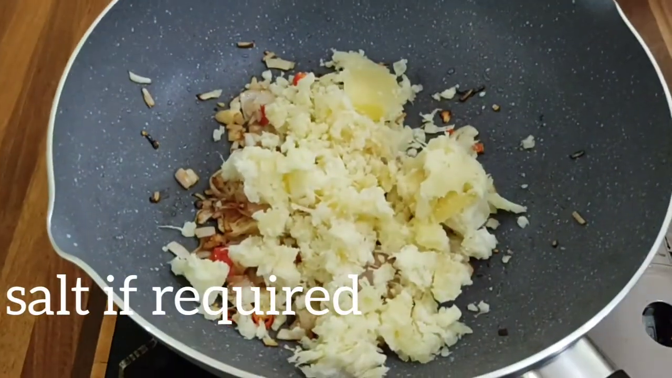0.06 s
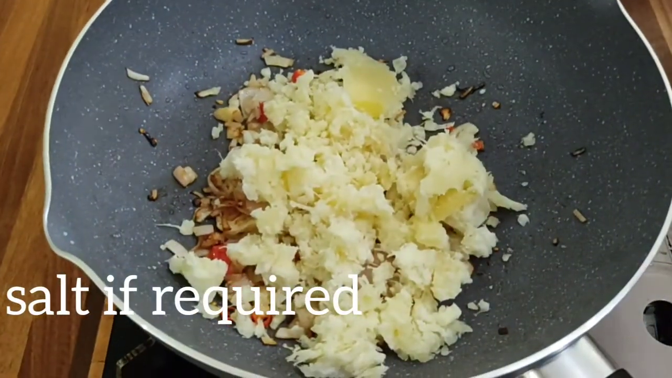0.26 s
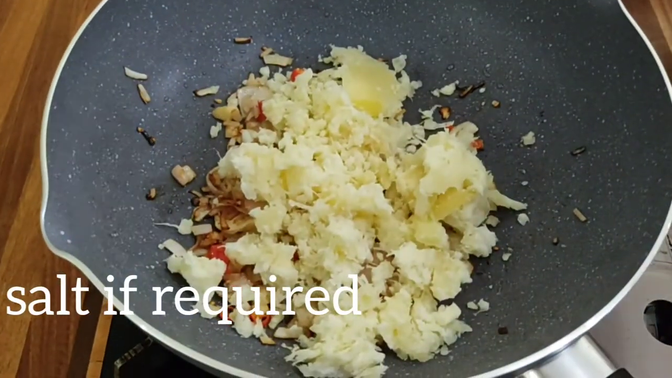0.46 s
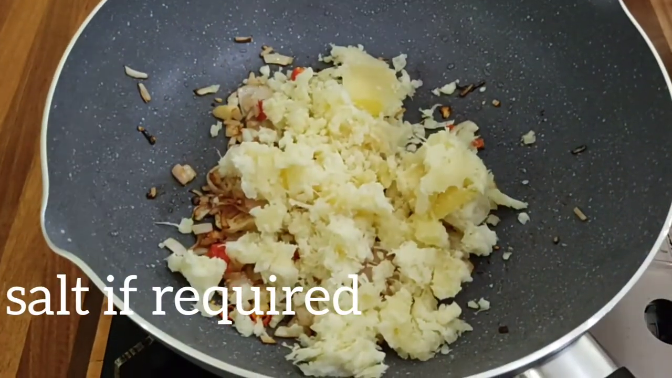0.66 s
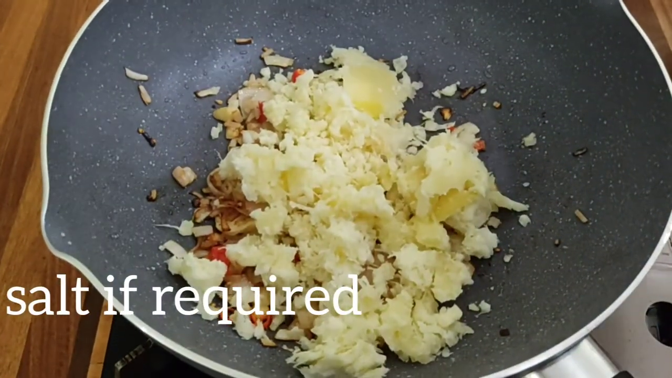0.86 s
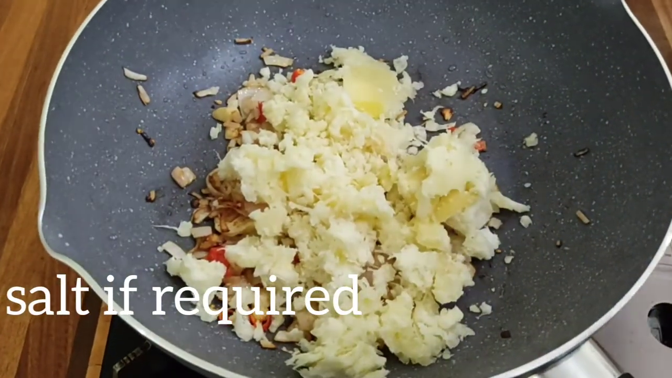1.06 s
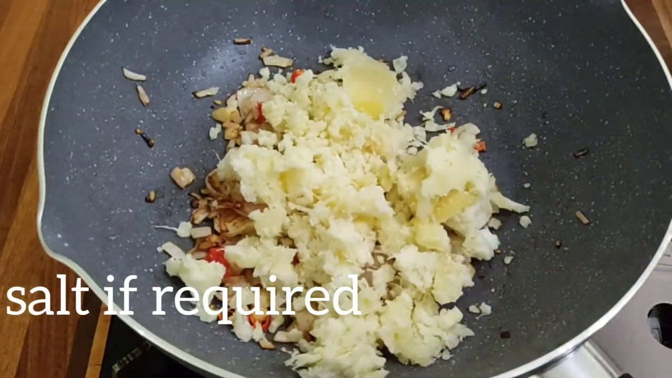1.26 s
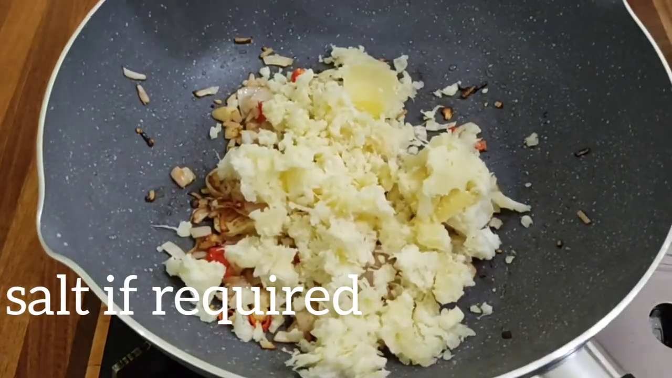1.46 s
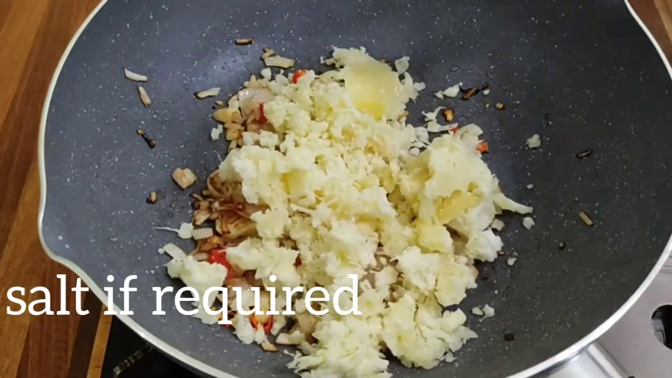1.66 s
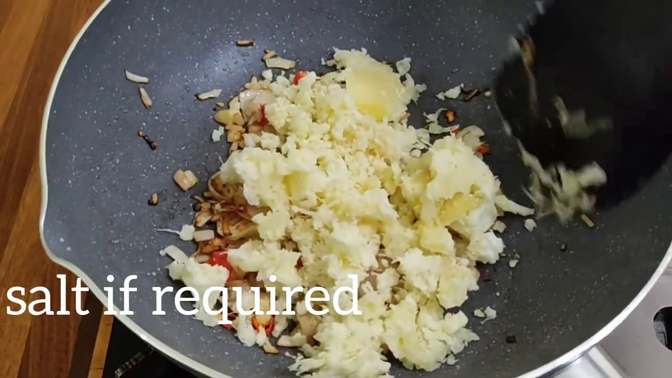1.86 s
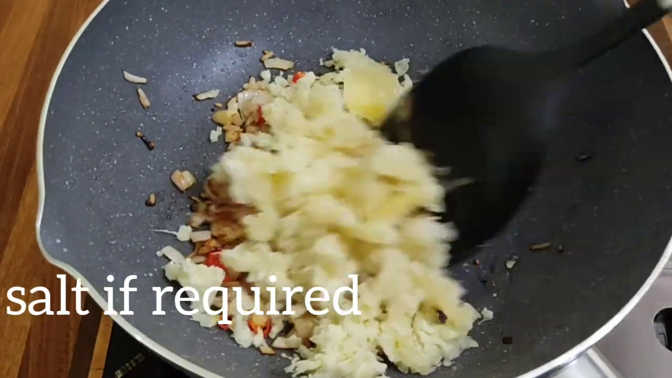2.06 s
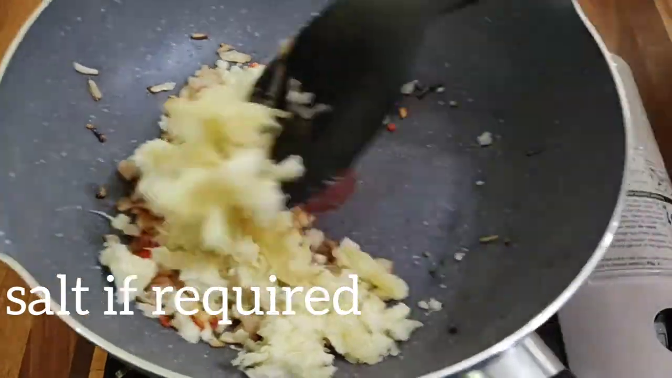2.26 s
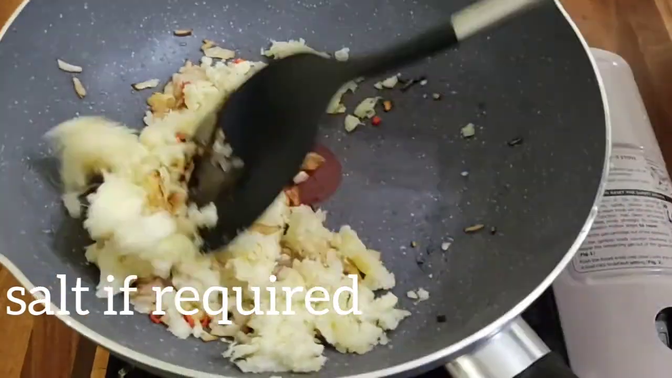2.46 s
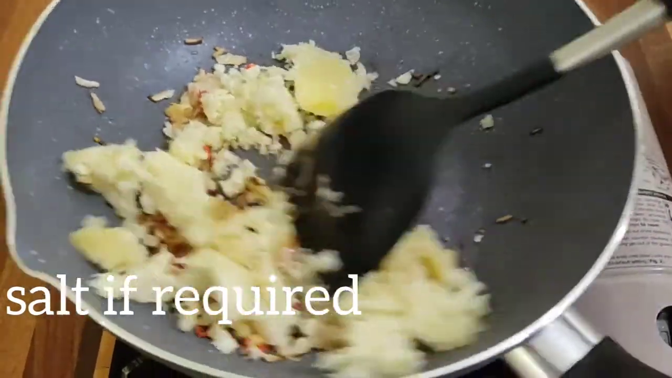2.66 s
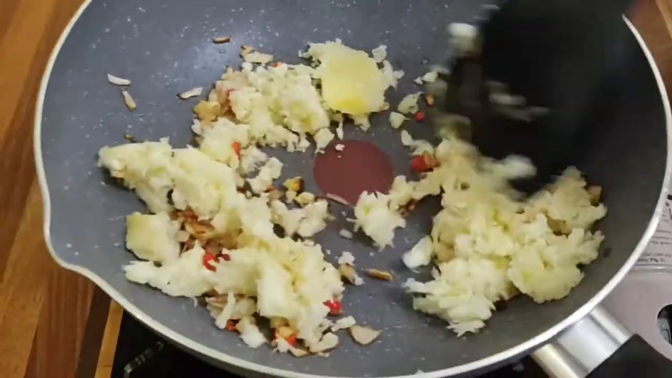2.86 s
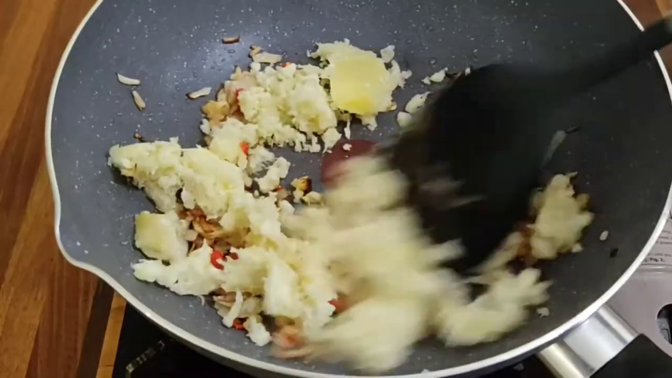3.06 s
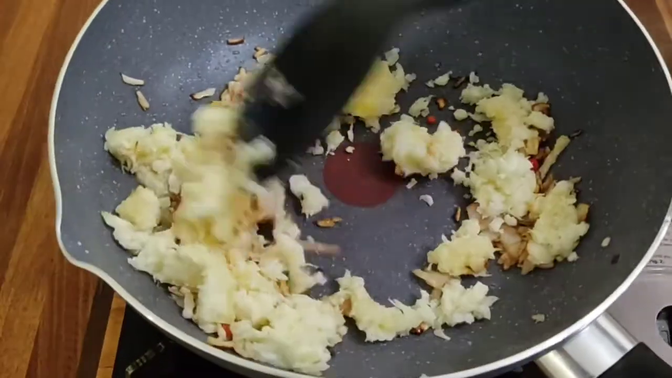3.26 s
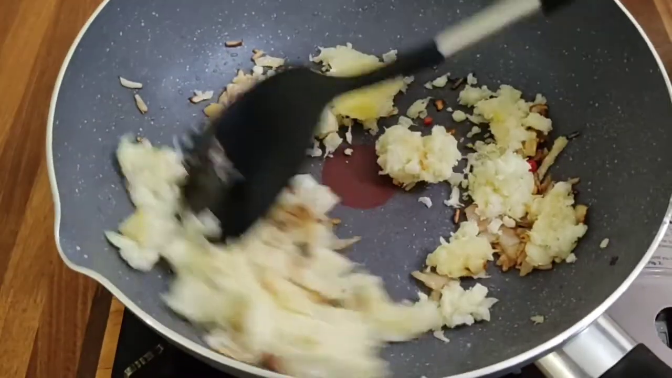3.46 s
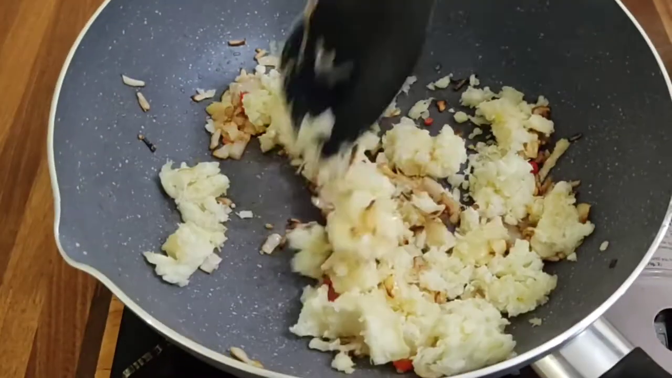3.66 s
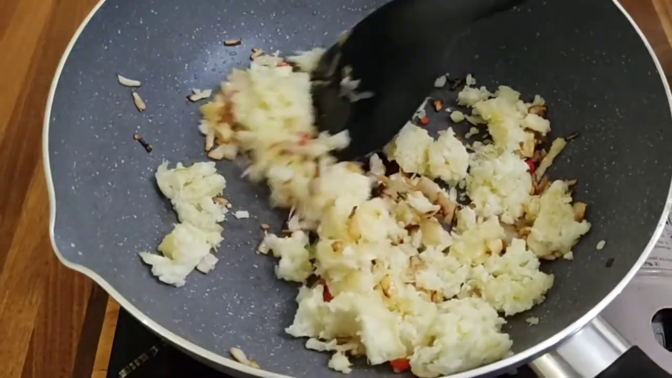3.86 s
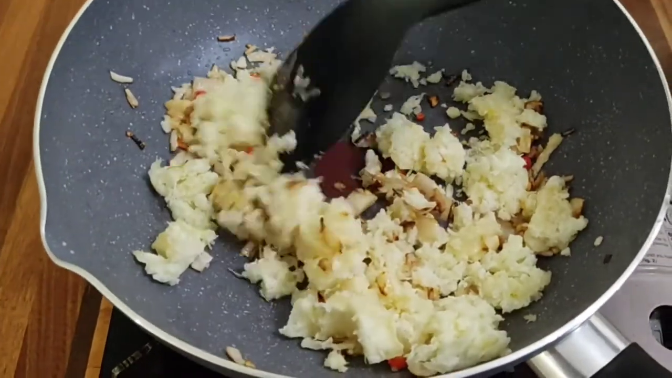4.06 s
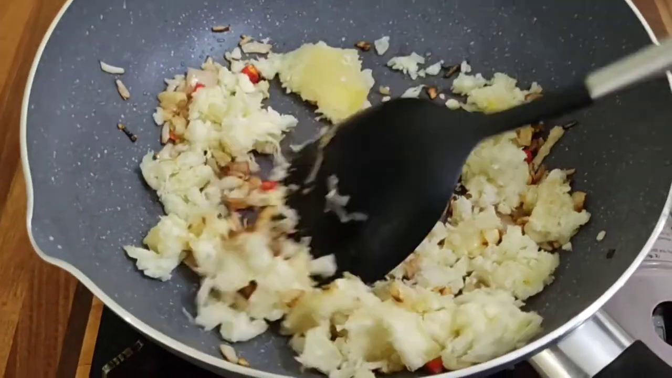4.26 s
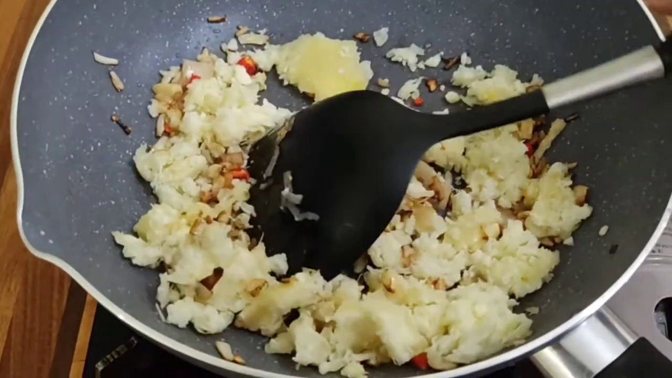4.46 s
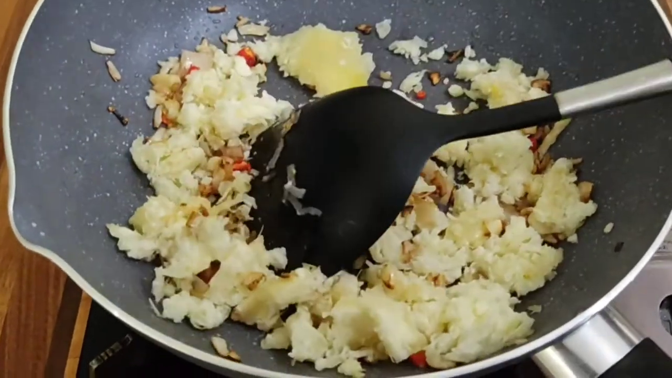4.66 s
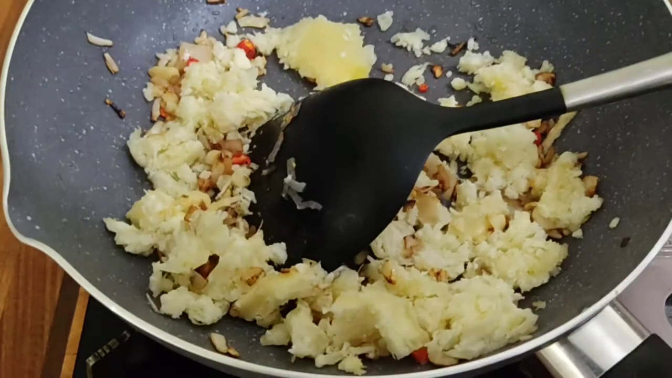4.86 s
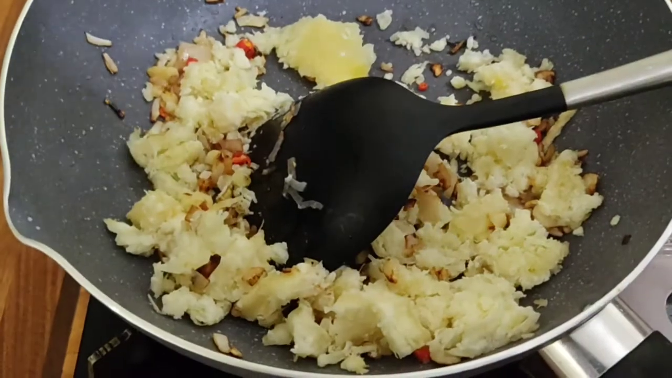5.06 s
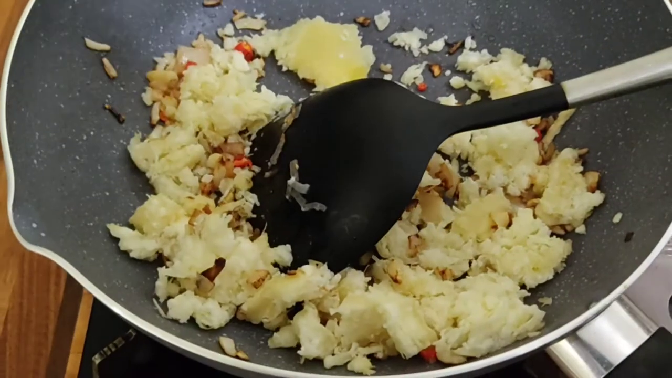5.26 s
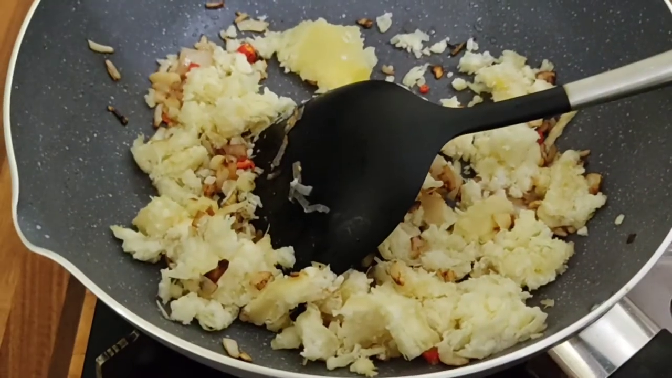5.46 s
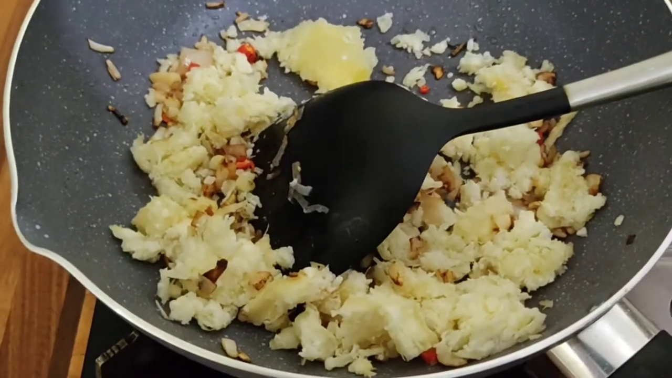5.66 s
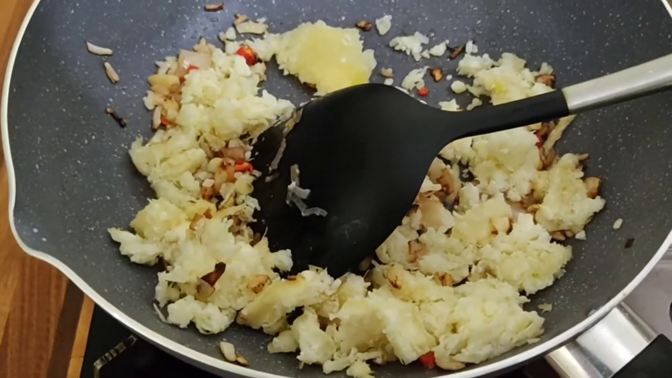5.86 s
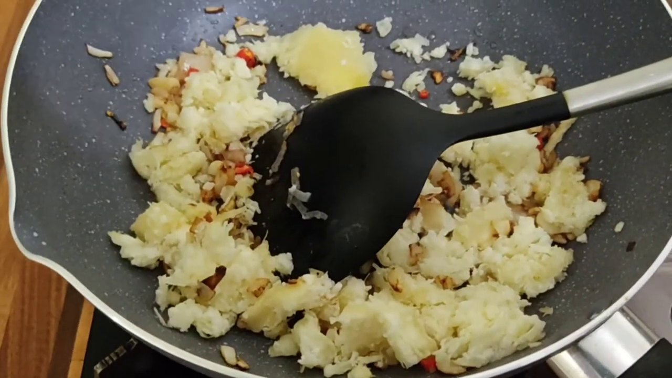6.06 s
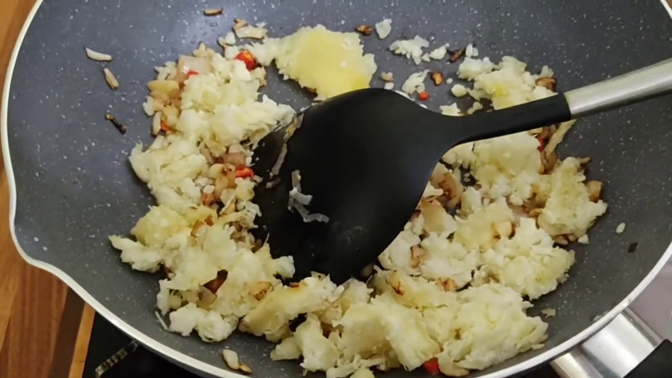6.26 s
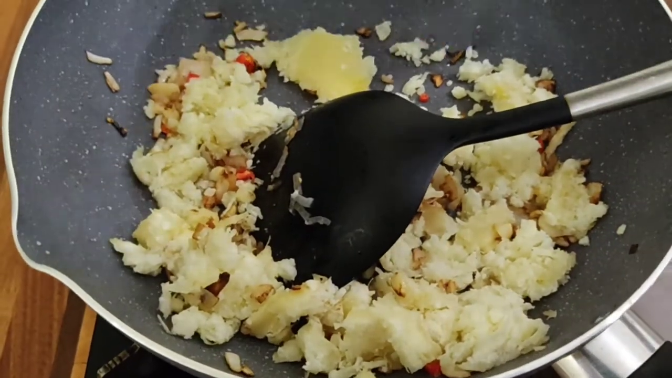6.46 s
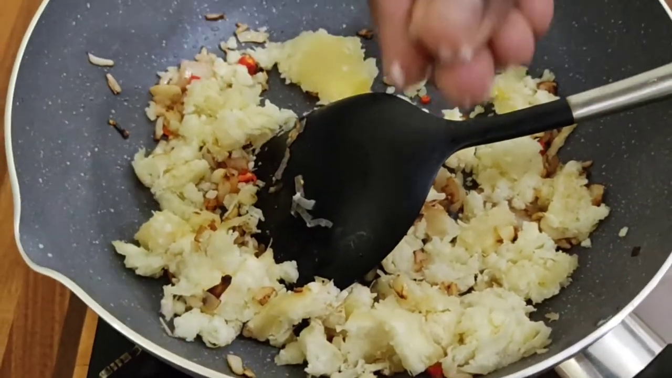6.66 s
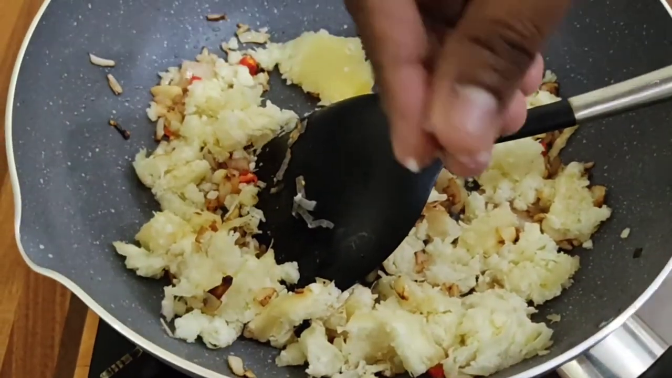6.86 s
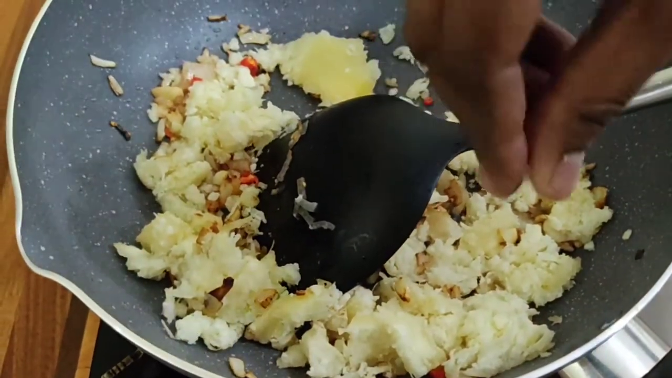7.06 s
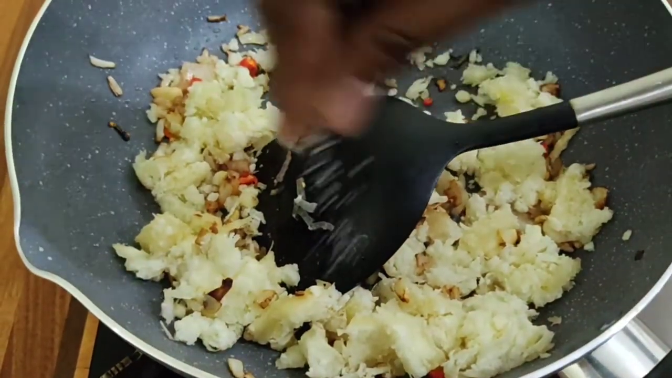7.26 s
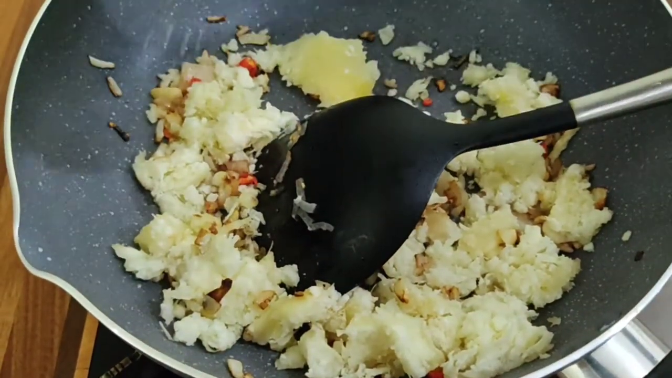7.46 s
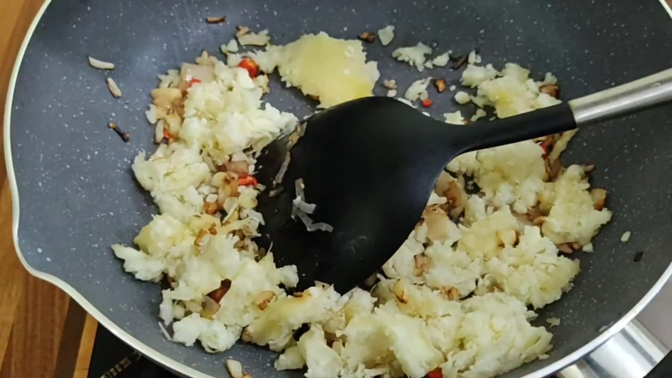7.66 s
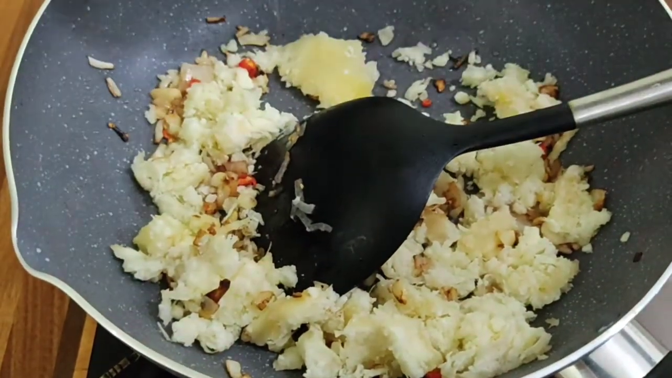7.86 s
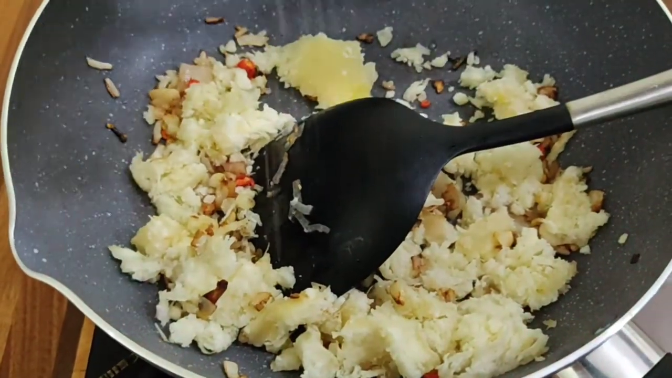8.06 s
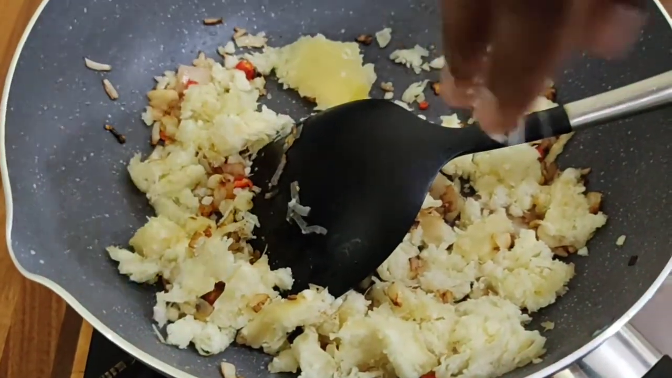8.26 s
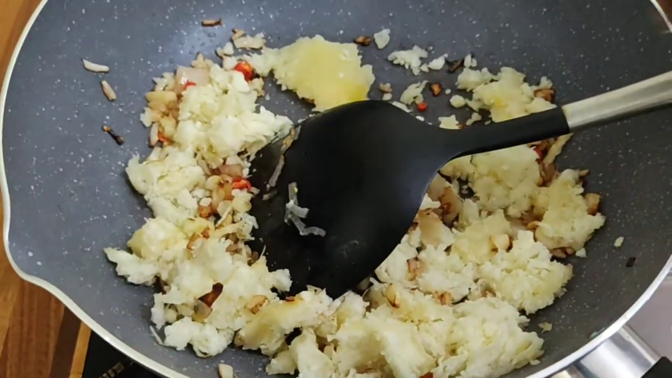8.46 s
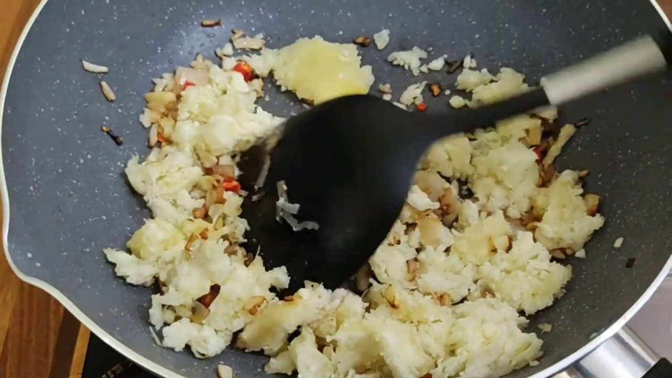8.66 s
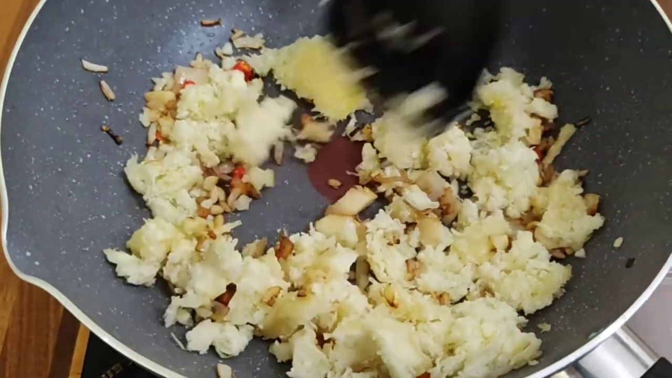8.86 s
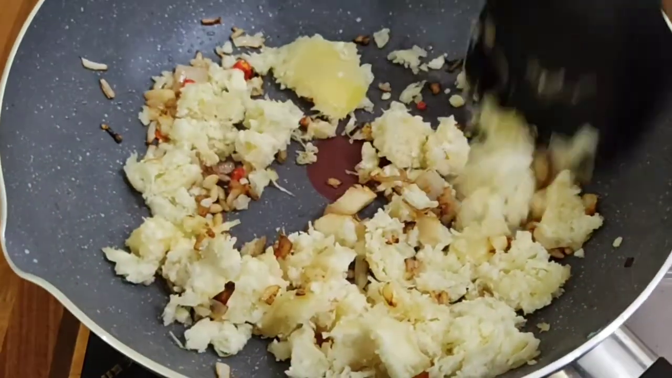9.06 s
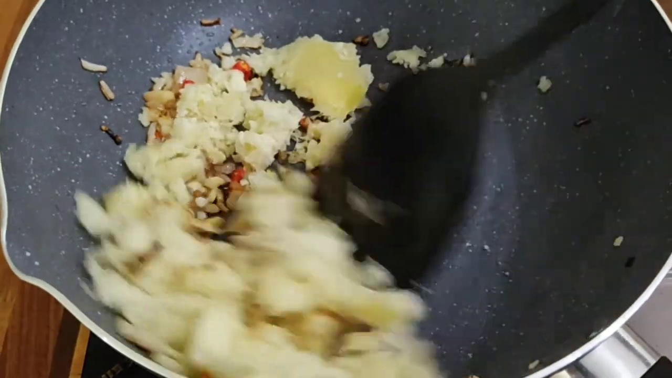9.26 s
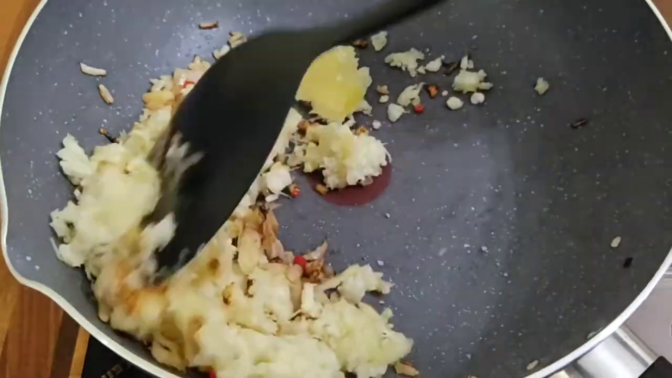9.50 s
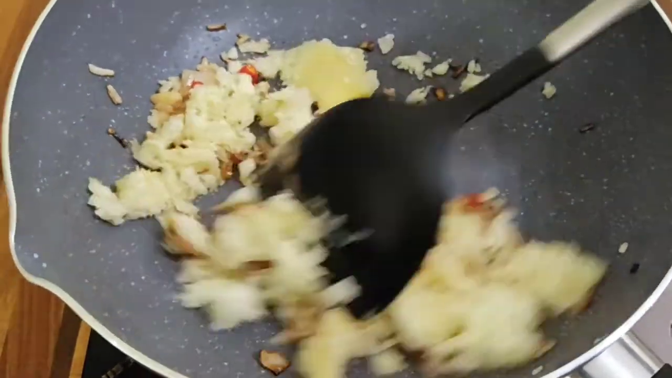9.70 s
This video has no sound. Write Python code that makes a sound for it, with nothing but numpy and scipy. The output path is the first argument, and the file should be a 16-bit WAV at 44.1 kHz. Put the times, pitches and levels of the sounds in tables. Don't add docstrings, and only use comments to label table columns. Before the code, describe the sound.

Dull wooden knocks, then a soft spatula drags and taps in a wok; wet food surges into hissing sizzle with sharp fat clicks and low motor hum.

```python
import sys
import numpy as np
from scipy import signal
from scipy.fft import rfft, irfft, next_fast_len
from scipy.io import wavfile
from scipy.ndimage import uniform_filter1d

SR = 44100
rng = np.random.default_rng(int(sys.argv[2]) if len(sys.argv) > 2 else 0)


def voltage_ratio(decibels):
    exponent = np.asarray(decibels, float) / 20
    return 10 ** exponent


def waveform_to_disk(signal):
    frames = np.transpose(np.atleast_2d(signal))
    scaled = np.clip(frames, -1, 1) * 32767
    samples = np.round(scaled).astype(np.int16)
    wavfile.write(sys.argv[1], SR, samples)


N = 429093
BINS = np.fft.rfftfreq(4096, 1 / SR)

# f/Hz, density/dB per Hz
AIR_SPECTRUM = [(8.8, -29), (15, 5.5), (71, -13), (121, -13.5), (154, -6.5), (268, -9.5), (299, -10),
                (365, -18), (399, -4), (426, -13), (608, -14), (1040, -21), (3000, -17.5), (3900, -29),
                (6600, -120)]
# f/Hz, rms level/dB, width/Hz
MOTOR_LINES = [(155.3, -62.5, 6.15), (300.7, -58.5, 1.35), (400, -59.5, 0.94), (612, -72.5, 0.98)]
# f/Hz, correlation/1
PORT_LIKENESS = [(60, 0.2), (110, 0.23), (200, 1), (380, 0.2), (700, 0.71), (1290, -0.4), (2380, -0.46),
                 (4400, -0.39), (8120, 0.0), (15000, 0.01)]
# f/Hz, level/dB
PORT_BALANCE = [(60, 1.5), (450, 3.5), (1400, 3), (2700, -2.5), (4100, 2), (6300, 4.5), (7600, -3),
                (8270, 9), (9000, 11), (9650, 17.5), (10300, 3.5), (11000, 5), (11700, 14), (13000, 1),
                (15000, 7.5)]
# f/Hz, t60/s
KITCHEN_DECAY = [(100, 1), (300, 0.61), (500, 0.74), (1000, 0.95), (2000, 0.85), (5000, 0.23)]
# t/s, peak level/dB, tilt/dB per octave, hollow note f/Hz, its lift/dB
KNOCKS = [
    (.548, -39.5, 11, 370, -5),
    (0.576, -7, 0.5, 350, 2),
    (0.638, -14, 3, 350, 10),
    (0.905, -14, -2.5, 366, 12.5),
    (5.408, -30.5, 5, 550, 31),
    (5.412, -31, 0, 320, 12),
    (5.441, -42, 5.5, 400, 2),
]
# hollow width/octaves, room level/dB, upper note f/Hz, its lift/dB, panel level/dB
KNOCK_CARRY = [(.5, 18, 800, 4, -20), (0.35, -3, 810, 8, -16), (0.28, -2, 790, 9, -15),
               (0.3, -2, 820, 8, -13.5), (0.17, 1.5, 1350, 14, -22), (0.34, -8, 900, -2, -25),
               (0.34, 3.5, 1000, 0, -27)]
# f/Hz, density/dB per Hz
BOARD_SPECTRUM = [(41, -51), (70, -33), (140, -12.5), (210, -12), (262, -1), (295, -5.5), (362, 3),
                  (414, -2.5), (482, -6.5), (611, -10), (643, -15.5), (788, -7.5), (1290, -16), (1400, -21),
                  (4000, -43.5), (5200, -64), (8800, -120)]
# f/Hz, level/dB, t60/s
PANEL_MODES = [(151.7, -0.5, 0.51), (178, -10, 1), (262, -4, 0.92), (340, -15, .5), (408, -7, .8),
               (508, -12, .4), (617, -9, 0.84), (735, -4, .6), (872, -2, .6), (970, -4, .4),
               (1070, 0, 0.49), (1145, -13, 0.58), (1240, -13, .4)]
# t/s, peak level/dB, edge level/dB, upper-mode share/dB, damping by food/dB per s
TAPS = [(1.865, -33, 4.5, 7.5, 35), (2.019, -35, -3, 5, 300), (2.322, -35.5, -10, -11, 300),
        (2.437, -17.5, -16, 10, 500), (2.444, -15, -18, -11, 400), (2.48, -21.5, -13, 2, 500),
        (2.578, -23, -10.5, 0, 498), (2.743, -30, -5.5, -6, 103), (2.84, -29.5, -12, -2, 300),
        (2.899, -35.5, -1, 2, 296), (3.078, -36, -16, 2, 200), (3.431, -4, -26, 7, 17),
        (3.838, -46, -4, 6, 197), (4.221, -24.5, -4, -1, 500), (4.227, -9.5, -21, 9.5, 206),
        (4.244, -35, -16, 3, 200), (4.555, -27.5, -11.5, 10, 130), (9.147, -32, -6, -9, 202),
        (9.211, -25.5, -16, 3, 150), (9.165, -36, -7, 0, 300), (9.188, -34, -7, 6, 300),
        (9.278, -42, -13, 0, 60), (9.612, -42.5, 5, 2, 100)]
# press time/ms, low-mode share/dB, pitch against the empty bowl/1
TAP_TOUCH = [(1.6, 13, 0.89), (3.1, -8, 1.3), (2.8, -10, 0.47), (0.33, 2, 1.034), (0.96, -7, 1.08),
             (1.3, 8, 1.15), (1.4, 3, 1.1), (3, -2, 1.06), (1.9, -1, .99), (2.4, 2, 0.92), (2.3, -4, 1.03),
             (0.96, 3, 1.0), (2.9, 0, 0.74), (0.86, -13, 1.18), (1.8, -10.5, 1.05), (1.6, -14, 1.4),
             (0.57, 1, 1.01), (3.4, -17, 1.1), (4.1, -22, 1.07), (2.2, -15, 1.3), (3, -16, 1.1),
             (4.2, -17, 1.05), (1.2, -5, 1.03)]
# start t/s, length/s, pressure level/dB
STROKES = [(1.867, 0.23, -36.5), (2.116, 0.57, -46.5), (2.5, 0.089, -46), (2.588, 0.24, -36.5),
           (2.75, 0.27, -42.5), (3.051, 0.16, -38), (3.51, 0.24, -44), (3.755, 0.2, -40.5),
           (4.268, 0.11, -45), (9.145, 0.12, -41), (9.42, 0.093, -47), (9.614, 0.25, -42.5)]
# f/Hz, level/dB, t60/s
BOWL_MODES = [(231, -7.5, 0.043), (320, -18, 0.12), (421, -6, 0.075), (455, -25.5, 0.97), (550, -2, 0.082),
              (562, -6, 0.19), (630, 11, 0.043), (663, -10.5, 0.39), (759, -7, 0.043), (966, -10, 0.041)]
# f/Hz, level/dB, t60/s
RIM_MODES = [(945, -1, 0.54), (1110, -3, 0.4), (1263, 9, 0.097), (1550, 7, 0.14), (1710, -6, 0.095),
             (1830, 5, 0.071), (2070, 10, 0.056), (2417, 7.5, 0.064), (2990, -13, 0.037)]
# t/s, peak level/dB, left-right/dB, low part against peak/dB, length/ms
SPITS = [(0.2493, -8.5, -7, -37, 1.14), (0.3742, -11, 9, -36, 1.4), (1.221, -12.5, -5, -39, 1.2),
         (1.466, -23, 8, -27, 1.3), (1.5296, -18, 2, -29, 1.3), (1.988, -8.5, -3, -19, 1.3),
         (2.161, -12, 3, -26, 1.4), (2.2316, -7, 8, -28, 1.3), (2.258, -8.5, 15, -37, 1.46),
         (2.674, -11, 1, -9, 1.33), (2.963, -8.5, -4, -37, 1.3), (2.9945, -11, -4, -30, 1.36),
         (3.6325, -3, -3, -40, 1.3), (3.7584, -11, -11, -44, 1.3), (3.9607, -7, -7, -35, 1.4),
         (4.1408, -10, -17.5, -43.5, 0.95), (4.567, -12, -1, -32, 1.3), (4.6475, -14, 10, -29, 1.3),
         (4.9594, -10, 5.5, -22, 1.3), (4.9662, -11, 10, -34, 1.4), (4.996, -5.5, 8, -40, 1.5),
         (5.2685, -15, 11, -33.5, 1.3), (5.3502, -22, 3.0, -42, 1.3), (5.3908, -9.5, -3, -49, 1.3),
         (5.863, -7, 5, -35, 1.3), (6.2504, -3, 1, -30, 1.35), (6.5525, -17, -2, -32, 1.34),
         (6.9367, -13.5, -13, -34, 1.4), (7.2726, -13, 1, -30, 1.3), (7.3108, -10, 1, -17, 1.3),
         (7.4307, -6, -2.5, -22, 1.32), (7.6248, -8.5, -1, -23, 1.27), (7.652, -11.5, -6, -36, 1.34),
         (7.892, -6.5, 15, -32, 1.37), (8.117, -19, 8, -29, 1.3), (8.3078, -30, 0, -32, 1.2),
         (8.853, -18, 4, -29, 1.2), (7.0462, -36, -1, -32, 1.2), (8.4557, -23, 0, -37, 1.3),
         (8.4896, -19, -1, -31, 1.3), (8.5943, -15, 1.5, -27, 1.3), (8.7535, -10.5, 0, -15.5, 1.3),
         (8.9148, -14, -1, -32, 1.13)]
# surge top t/s, sizzle level/dB, rise/s, left-right/dB
TURNS = [
    (2.26, -30.5, .15, 0.5),
    (2.68, -19.5, 0.11, 1),
    (3.1, -20, 0.065, 2.5),
    (3.38, -31, 0.037, 0),
    (3.59, -19, 0.065, 4),
    (3.9, -26.5, 0.08, 2),
    (4.33, -26.5, 0.15, 4.5),
    (9.1, -35, 0.021, 1),
    (9.3, -28.5, 0.24, 3),
    (9.651, -23, 0.11, 4.5),
]
# f/Hz, density/dB per Hz
SIZZLE_SPECTRUM = [(530, -32), (900, -25.5), (1050, -28), (1220, -23), (2040, -21.5), (2790, -19),
                   (3380, -18), (3550, -16), (5100, -12.5), (7580, 1.5), (8870, 5), (9420, -3.5),
                   (10900, -15), (14000, -16.5), (15800, -29.5)]
# lower f/Hz, upper f/Hz
GATE_BANDS = [(1500, 6600), (10200, 16000)]

REST_DB = -29


def evened(x):
    return x / np.sqrt(np.mean(x ** 2) + 1e-20)


def read(points, hz):
    f, value = np.transpose(points)
    return np.interp(np.log(hz + 1), np.log(f + 1), value)


def add(mix, s, sound):
    part = mix[..., round(s * SR):][..., :sound.shape[-1]]
    part += sound[..., :part.shape[-1]]


def leaning(db):
    return voltage_ratio(np.array([[0.5], [-0.5]]) * db)


def causal(db):
    log_gain = np.log(voltage_ratio(np.maximum(db, -100)))
    circle = np.concatenate([log_gain, log_gain[-2:0:-1]])
    return np.fft.ifft(np.exp(np.conj(signal.hilbert(circle)))).real[:2048]


def wander(hz):
    steps = rng.standard_normal(2000)
    return evened(np.interp(np.arange(N) / SR * hz, np.arange(len(steps)), steps))


def ring(modes, rise_s):
    t = np.arange(SR // 2) / SR
    out = np.zeros(len(t))
    for k, (hz, db, t60) in enumerate(modes):
        out += (-1) ** k * voltage_ratio(db - 60 * t / t60) * np.sin(2 * np.pi * hz * t)
    out *= 1 - np.exp(-(t / rise_s) ** 2)
    return out / abs(out).max()


def room_tone():
    air_db, patchy_db = -49, 2.5
    frames, hz = N // 512 + 5, np.fft.rfftfreq(2048, 1 / SR)
    a, b, c, d, patches = rng.standard_normal((frames, 1025, 5)).T
    patches = evened(uniform_filter1d(uniform_filter1d(patches, 10, 0), 8, 1))
    same = np.clip(read(PORT_LIKENESS, hz), -1, 1)[:, None]
    left = a + 1j * b
    right = same * left + np.sqrt(1 - same ** 2) * (c + 1j * d)
    balance_db = read(PORT_BALANCE, hz)[:, None] * np.array([0.5, -0.5])[:, None, None]
    z = np.array([left, right]) * voltage_ratio(read(AIR_SPECTRUM, hz)[:, None] + patchy_db * patches + balance_db)
    air = voltage_ratio(air_db) * evened(signal.istft(z, nperseg=2048, noverlap=1536)[1][:, :N])
    hum = np.zeros(N)
    for f, db, width in MOTOR_LINES:
        phase = 2 * np.pi * np.cumsum(f + width * wander(8.7)) / SR
        hum += voltage_ratio(db + 4.5 + 0.85 * wander(2.65)) * np.sin(phase)
    return air + hum * leaning(3)


def kitchen(x, same):
    echoes = np.zeros((2, SR))
    at = np.arange(200, SR - 20, 20) + rng.integers(0, 20, (2, (SR - 201) // 20))
    np.put_along_axis(echoes, at, rng.choice([-1., 1.], at.shape), 1)
    hz, t, z = signal.stft(echoes, SR, nperseg=256)
    like = np.clip(same + read(PORT_LIKENESS, hz), -1, 1)[:, None]
    z = np.array([z[0], like * z[0] + np.sqrt(1 - like ** 2) * z[1]])
    decay = voltage_ratio(-60 * t / read(KITCHEN_DECAY, hz)[:, None])
    tail = signal.istft(z * decay, SR, nperseg=256)[1]
    return signal.fftconvolve(x[None], tail / np.linalg.norm(tail[0]), axes=1)[:, :N]


def counter():
    blow, rattle_s, rise_s = 6, 0.013, 0.0021
    out, t = np.zeros((2, N)), np.arange(4000) / SR
    panel = ring(PANEL_MODES, 0.0067)
    for knock, carry in zip(KNOCKS, KNOCK_CARRY):
        s, peak_db, tilt_db, note_hz, lift_db = knock
        octaves, room_db, upper_hz, upper_db, panel_db = carry
        hollow_db = lift_db * np.exp(-(np.log2((BINS + 1) / note_hz) / octaves) ** 2)
        hollow_db += upper_db * np.exp(-(np.log2((BINS + 1) / upper_hz) / 0.071) ** 2)
        board_db = read(BOARD_SPECTRUM, BINS) + tilt_db * np.log2(BINS / 500 + 0.16)
        plain_db = uniform_filter1d(board_db, size=9)
        rattle = rng.standard_normal(len(t)) * np.exp(-t / rattle_s) * (1 - np.exp(-t / rise_s))
        hit = rattle + blow * (t == 0)
        thud = np.array([np.convolve(hit, causal(db)) for db in (board_db + hollow_db, plain_db)])
        add(out, s, voltage_ratio([[peak_db], [peak_db + room_db]]) * thud / abs(thud).max(1, keepdims=True))
        add(out[0], s, voltage_ratio(peak_db + panel_db) * panel)
    return out


def handle_bump():
    t = np.arange(SR // 5) / SR
    return voltage_ratio(-44) * np.sin(2 * np.pi * 101 * t) * t / 0.022 * np.exp(1 - t / 0.011)


def struck_bowl(press_ms, low_db, pitch):
    split_hz = 555
    modes = [(hz * pitch, db + low_db * (hz < split_hz), t60) for hz, db, t60 in BOWL_MODES]
    return ring(modes, press_ms / 1000)


def taps(rim):
    out, t = np.zeros(N), np.arange(3000) / SR
    grit = signal.butter(2, [1000, 6000], "bandpass", fs=SR, output="sos")
    for (s, peak_db, edge_db, rim_db, damp_db), touch in zip(TAPS, TAP_TOUCH):
        food = voltage_ratio(-damp_db * np.arange(len(rim)) / SR)
        scuff = signal.sosfilt(grit, rng.standard_normal(len(t)))
        scuff *= np.exp(-t / 0.0014) + 0.5 * np.exp(-t / 0.039)
        add(out, s - 0.001, voltage_ratio(peak_db) * struck_bowl(*touch) * food)
        add(out, s - 0.002, voltage_ratio(peak_db + edge_db + rim_db) * rim * food)
        add(out, s - 0.002, voltage_ratio(peak_db + edge_db + 12.5) * scuff * np.minimum(t / 0.00083, 1))
    return out


def strokes(rim):
    slips_per_s, press_s, ease_db, chatter_db = 900, 0.028, -6.5, 5
    slips = (rng.random(N) < slips_per_s / SR) * rng.choice([-1, 1], N)
    slips = slips * voltage_ratio(1.6 * np.minimum(rng.exponential(1, N), 3))
    body = struck_bowl(press_ms=0.77, low_db=7, pitch=1.043) + voltage_ratio(-1.5) * rim
    body *= voltage_ratio(-700 * np.arange(len(rim)) / SR)
    drag = evened(signal.oaconvolve(slips, body)[:N])
    drag *= voltage_ratio(chatter_db * wander(22))
    out = np.zeros(N)
    for s, length, db in STROKES:
        u = (np.arange(N) / SR - s) / length
        pressed = np.clip(np.minimum(u, 1 - u) * length / press_s, 0, 1)
        out += voltage_ratio(db - 4.0 + ease_db * u.clip(0, 1)) * pressed * drag
    return out


def spatula():
    rim = ring(RIM_MODES, 0.00027)
    bass_cut = signal.butter(2, 170, "highpass", fs=SR, output="sos")
    return signal.sosfilt(bass_cut, taps(rim) + strokes(rim))


def at_ports(x):
    lag_s, most_turn = 0.0002, 2.4
    size = next_fast_len(N)
    hz = np.fft.rfftfreq(size, 1 / SR)
    turn = most_turn * np.tanh(2 * np.pi * hz * lag_s / most_turn)
    return np.array([irfft(rfft(x, size) * np.exp(-1j * turn), size)[:N], x])


def port_colour(x, low_db):
    fizz_db, balance_db = read(SIZZLE_SPECTRUM, BINS), read(PORT_BALANCE, BINS)
    responses = np.array([causal(fizz_db + side * balance_db / 2) for side in (1, -1)])
    y = signal.oaconvolve(x, responses, axes=1)[:, :x.shape[1]]
    low = signal.sosfilt(signal.butter(2, 5200, fs=SR, output="sos"), y)
    return y + (voltage_ratio(low_db) - 1) * low


def heat():
    drying_db_per_s, rest_pan_db = 0.41, 3
    flash_db_per_s, linger_db, linger_db_per_s = 23, -9, 4
    t = np.arange(N) / SR
    power = voltage_ratio(2 * (REST_DB - drying_db_per_s * t))
    lean = power * rest_pan_db
    for s, db, rise_s, pan_db in TURNS:
        after = np.maximum(t - s, 0)
        fade = voltage_ratio(-2 * flash_db_per_s * after) + voltage_ratio(2 * (linger_db - linger_db_per_s * after))
        surge = voltage_ratio(2 * db) * fade * np.exp(-(np.minimum(t - s, 0) / rise_s) ** 2)
        power = power + surge
        lean = lean + surge * pan_db
    return 10 * np.log10(power), lean / power


def bursts(count, seconds):
    t = np.arange(400) / SR
    shapes = rng.standard_normal((count, 2, len(t))) * t * np.exp(-t / seconds)
    return shapes / np.linalg.norm(shapes, axis=2, keepdims=True)


def small_spits():
    per_s, above_sizzle_db, spread_db = 5, 3, 2
    wait, size, side, low = rng.random((200, 4)).T
    when = np.cumsum(-np.log(wait)) / per_s
    level_db = np.interp(when * SR, np.arange(N), heat()[0]) + above_sizzle_db
    level_db -= spread_db * np.log(size + 0.13)
    return np.transpose([when, level_db, 6 * side, -30 - 12 * low, 1.5 * low])[when < N / SR]


def spits():
    boost_db, follow_db, spray_db, spray_s = -1.1, -11, -26, 0.0035
    out, t = np.zeros((2, N)), np.arange(3000) / SR
    shapes = bursts(count=40, seconds=0.00017)
    dull = signal.butter(3, 10600, fs=SR, output="sos")
    for s, peak_db, pan_db, low_db, length_ms in list(SPITS) + list(small_spits()):
        when, size, which = rng.random((3, 4))
        cluster = voltage_ratio(spray_db) * rng.standard_normal((2, len(t))) * np.exp(-t / spray_s)
        add(cluster, 0, shapes[int(which[0] * len(shapes))])
        for u, v, w in zip(when, size, which[::-1]):
            weaker = voltage_ratio(follow_db - 5.2 * v) * shapes[int(w * len(shapes))]
            add(cluster, u * length_ms / 1000, weaker)
        cluster = signal.sosfilt(dull, port_colour(cluster, low_db + 24))
        cluster = cluster * leaning(pan_db - 2.5)
        add(out, s, voltage_ratio(peak_db + boost_db) * cluster / abs(cluster.mean(0)).max())
    return out


def bubbles(count, cycles):
    t = np.arange(600) / SR
    detune = 1 + 0.071 * rng.standard_normal((count, 2, 1))
    hz = np.geomspace(900, 15500, count)[:, None, None] * detune
    phase = rng.random((count, 2, 1))
    shapes = np.sin(2 * np.pi * (hz * t + phase)) * np.exp(-t * hz / cycles)
    return shapes * np.sqrt(hz) / np.linalg.norm(shapes, axis=2, keepdims=True)


def sizzle():
    per_s, own_db, hiss_db = 6000, 2.5, -1
    spurt_db, flutter_db = 0.11, 0.5
    level_db, pan_db = heat()
    wet_db = 3.5 - 0.1729 * (level_db - REST_DB)
    shapes = bubbles(count=24, cycles=1.34)
    which = rng.integers(0, len(shapes), N)
    rhythms = np.array([wander(25) for _ in range(6)])
    size = (rng.random(N) < per_s / SR) * voltage_ratio(own_db * rhythms[which // 4, np.arange(N)])
    sized = size * leaning(3.2 * rng.standard_normal(N))
    pops = np.zeros((2, N))
    for k, shape in enumerate(shapes):
        pops += signal.oaconvolve(sized * (which == k), shape, axes=1)[:, :N]
    raw = evened(pops) + voltage_ratio(hiss_db) * rng.standard_normal((2, N))
    raw *= voltage_ratio(spurt_db * wander(18) + flutter_db * wander(70))
    scale = np.std(port_colour(raw, 0))
    return voltage_ratio(3.0 + level_db) * leaning(pan_db - 6) * port_colour(raw, wet_db) / scale


def scene():
    pan, knocks = spatula(), counter()
    add(knocks, 4.56, handle_bump())
    near = at_ports(pan) * leaning(1.2)
    far = (voltage_ratio(1.5) * knocks[0] + kitchen(knocks[1], 0.27)) * leaning(4.4)
    return room_tone() + far + voltage_ratio(-11) * kitchen(pan, 0.05) + near + spits() + sizzle()


def gate(x):
    margin_db, cut_db = -0.5, -40
    turn = np.array([[1, 0.95], [1, -1.028]]) / np.sqrt(2)
    hz, t, z = signal.stft(turn @ x, SR, "cosine", nperseg=2048, noverlap=1024)
    patch_db = 10 * np.log10(abs(uniform_filter1d(abs(z) ** 2, size=3, axis=1)) + 1e-20)
    gated = sum((hz > lo) & (hz < hi) for lo, hi in GATE_BANDS)[:, None] > 0
    weak = gated & (patch_db < uniform_filter1d(patch_db, size=48, axis=1) + margin_db)
    return turn @ signal.istft(z * voltage_ratio(cut_db * weak), SR, "cosine", nperseg=2048, noverlap=1024)[1][:, :N]


def low_pass(x):
    return signal.sosfilt(signal.butter(12, 15830, fs=SR, output="sos"), x)


def record(dry):
    return low_pass(gate(dry))


dry = scene()
out = record(dry)
waveform_to_disk(out)
```